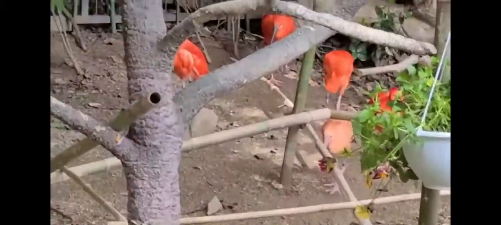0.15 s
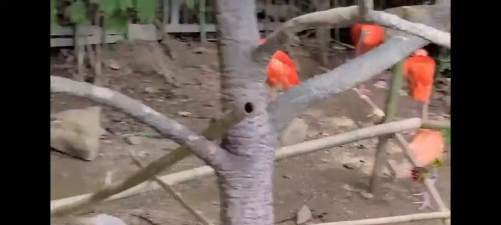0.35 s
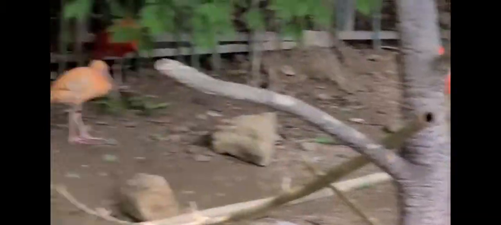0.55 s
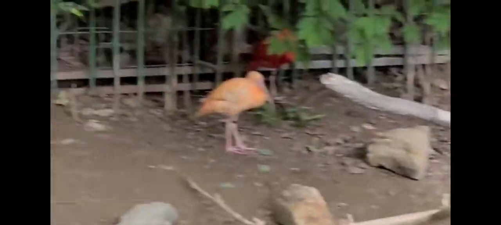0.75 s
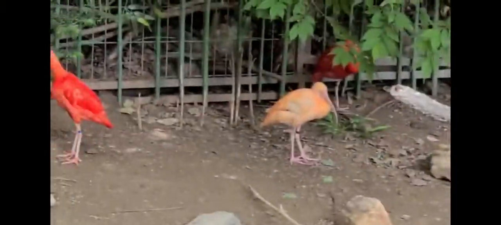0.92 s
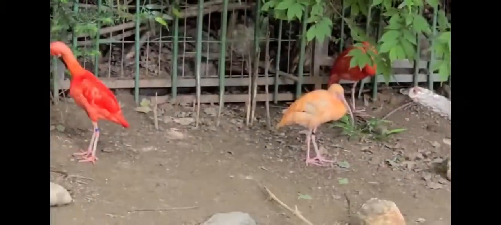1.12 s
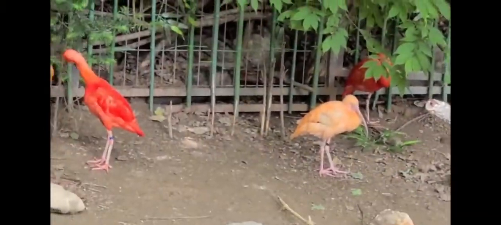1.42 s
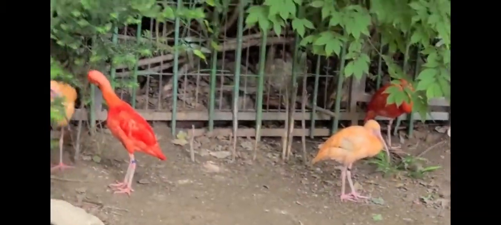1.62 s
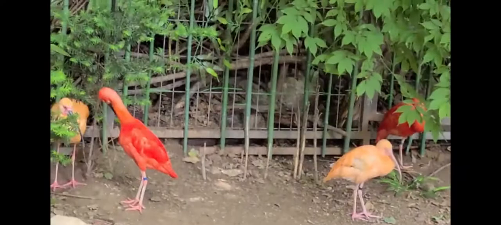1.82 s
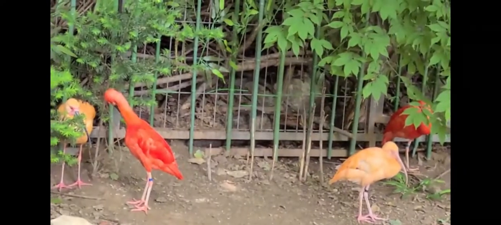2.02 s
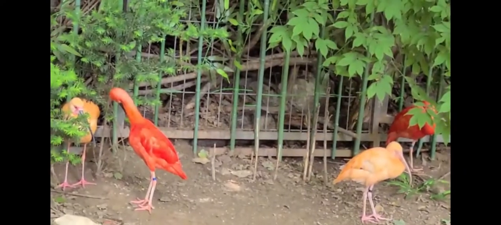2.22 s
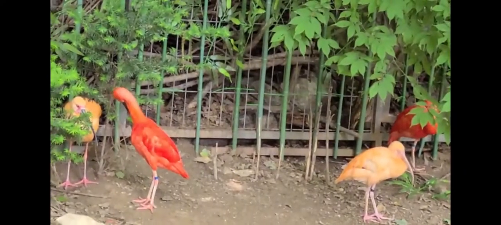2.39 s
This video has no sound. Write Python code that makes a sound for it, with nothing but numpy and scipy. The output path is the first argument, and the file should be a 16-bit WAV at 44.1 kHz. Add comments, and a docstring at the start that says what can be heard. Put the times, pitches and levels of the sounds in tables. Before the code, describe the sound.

Guttural bird grunts sound close and slightly right, then softer grunts, clipped barks and nasal honks answer from farther off, over murmuring flock, faint hiss and low rumble, picked up by a handheld stereo microphone outdoors.

```python
"""Gabbling flock of wading birds

Wading birds, probably flamingos, gabble in an outdoor enclosure. Each call is a train of throat pulses,
110 to 144 a second, that rings the bird's resonances and chops a rasp of air. Near birds grunt on the right;
others grunt, bark and honk further off. Shaped noise makes the flock's murmur, an air hiss and a low rumble."""
import sys
import numpy as np
from scipy import signal
from scipy.fft import rfft, irfft, next_fast_len
from scipy.io import wavfile
from scipy.ndimage import map_coordinates

SR = 44100
rng = np.random.default_rng(int(sys.argv[2]) if len(sys.argv) > 2 else 0)


def transcribe(signal):
    """Save signal, clipped to [-1, 1], as a 16-bit WAV file at the path in sys.argv[1]."""
    frames = np.atleast_2d(signal).T
    limited = np.clip(frames, -1, 1)
    pcm = np.round(limited * 32767).astype(np.int16)
    wavfile.write(sys.argv[1], SR, pcm)


N = 112454

# Near grunts: t/s, length/s, level/dB, pulse rate/Hz, throat tuning/ratio,
# second resonance/dB, upper resonances/dB, rasp/dB
NEAR_GRUNT_CALLS = [ (.1695, 0.078, -13.5, 119.3, 1.02, -11.5, -11.5, -18.5),
                    (.2505, .06, -19.5, 113.9, 0.97, -11.5, -10, -18),
                    (.3085, 0.18, -14, 115.8, 1.006, -10, -16.5, -17),
                    (.508, 0.051, -17.5, 119.8, 1, -13, -27, -28),
                    (.55, 0.1195, -13, 116.8, 1.012, -13.5, -21.5, -19),
                    (2.1685, .088, -15.5, 119.7, 0.98, -12.5, -8.5, -16),
                    (2.2905, 0.16, -16, 116.2, 0.974, -8.5, -4.5, -14),
                    (2.4355, 0.054, -19, 113.3, 0.97, -9, -6, -20),
                    (2.505, 0.18, -20, 112, .96, -5.5, -8, -16)]
# Near throats, in low, second and upper groups: f/Hz, width/Hz, level/dB
NEAR_RESONANCES = ([(1031, 134, -1), (847, 100, -10.5), (1350, 320, -22)], [(2263, 270, 3),
                   (3080, 710, -14)], [(3390, 360, -10.5), (4630, 210, -10), (6730, 3600, -17)])
# Rasp spectrum of grunts and honks: f/Hz, relative density/dB per Hz
GRUNT_RASP_SPECTRUM = [(600, -7), (1500, 13), (3200, 4), (6000, 0), (9000, -5.5), (12000, -3.5),
                       (15500, -5.5)]


def near_grunts():
    """Sharp-onset, lightly scattered pulse trains; earlier and louder on the right."""
    return birds(NEAR_GRUNT_CALLS, NEAR_RESONANCES, GRUNT_RASP_SPECTRUM,
                 attack_s=0.007, release_s=0.0079, jitter_s=0.00008, phase_spread_rad=0.51,
                 scatter_db=-12, left_lag_ms=0.125, left_minus_right_db=-1.1, echo_db=-9)


# Far grunts: t/s, length/s, level/dB, pulse rate/Hz, throat tuning/ratio,
# second resonance/dB, upper resonances/dB, rasp/dB
FAR_GRUNT_CALLS = [ (.95, 0.069, -27.5, 116.8, 0.99, -9, -10, -14),
                   (1.001, 0.078, -25, 113.2, .99, -6, -12, -13),
                   (1.222, 0.12, -23, 114.8, 0.97, -9.5, -12, -19.5),
                   (1.33, 0.089, -28.5, 114.5, 1.0, -5, -16, -10),
                   (1.527, 0.15, -25, 113.1, 0.98, -8, -9, -17)]
# Far throats, in low, second and upper groups: f/Hz, width/Hz, level/dB
FAR_RESONANCES = ([(976, 158, 3.5), (829, 60, -8.5), (1250, 390, -4.5)], [(2310, 300, 4),
                  (2015, 180, -2.5)], [(3460, 700, -10.5), (4760, 250, -12)])


def far_grunts():
    """Softer grunts, heavily scattered on their way."""
    return birds(FAR_GRUNT_CALLS, FAR_RESONANCES, GRUNT_RASP_SPECTRUM,
                 attack_s=0.018, release_s=0.012, jitter_s=0.00014, phase_spread_rad=0.34,
                 scatter_db=2.5, left_lag_ms=0.02, left_minus_right_db=1.2, echo_db=-8)


# Barks: t/s, length/s, level/dB, pulse rate/Hz, throat tuning/ratio,
# second resonance/dB, upper resonances/dB, rasp/dB
BARK_CALLS = [ (.028, 0.047, -20, 125.9, 1.0, -11, -19, -12),
              (.172, 0.048, -23.5, 119.5, 1.04, -17, -5, -9),
              (.399, 0.061, -19.5, 120.4, 0.97, -10, -13, -12),
              (.467, 0.033, -22.5, 118.7, 1.05, -11, -11, -1.5),
              (.691, 0.046, -25.5, 115.9, 0.83, -13, -9, -1.5),
              (.877, 0.046, -21.5, 110.1, 1.03, -15, -13, -8),
              (1.112, 0.057, -19.5, 125.5, 0.977, -1.5, -7.5, -11),
              (1.359, 0.057, -21.5, 117.1, 0.986, 0.5, -8.5, -13.5),
              (1.418, 0.0509, -21.5, 117.3, 0.986, -0.5, -7.5, -14.5),
              (1.652, 0.039, -16.5, 121.8, 1.03, -1.5, -8.5, -17.5),
              (1.969, 0.047, -19.5, 116.9, 1.01, -15, -11, -15),
              (2.203, 0.053, -24, 119.5, 1.04, -6, -7.5, -11.5)]
# Barking throats, in low, second and upper groups: f/Hz, width/Hz, level/dB
BARK_RESONANCES = ([(1149, 246, 2.5), (1343, 215, -9.5)], [(2456, 275, -3), (2890, 330, -11.5)],
                   [(3860, 570, -2), (5067, 260, -6), (6190, 400, -12)])
# Bark rasp spectrum: f/Hz, relative density/dB per Hz
BARK_RASP_SPECTRUM = [(600, -50), (1500, 9), (3200, -1), (6000, 5.5), (8200, -6), (12000, 4.5), (15500, -3)]


def barks():
    """Short pulse trains with a rasp of their own colour."""
    return birds(BARK_CALLS, BARK_RESONANCES, BARK_RASP_SPECTRUM,
                 attack_s=0.026, release_s=0.016, jitter_s=0.00022, phase_spread_rad=0.58,
                 scatter_db=-4, left_lag_ms=-0.008, left_minus_right_db=0.9, echo_db=-7)


# Honks: t/s, length/s, level/dB, pulse rate/Hz, throat tuning/ratio,
# second resonance/dB, upper resonances/dB, rasp/dB
HONK_CALLS = [ (0, 0.088, -21, 130.6, 0.96, -9.5, -13.5, -12.5),
              (.25, 0.084, -22, 140.4, 0.97, -13, -21, -17),
              (.675, 0.091, -23.5, 134.2, 1.035, -18, -31, -12),
              (.9, 0.1, -26.5, 132.9, 0.94, -15, -29, -18), (1.33, 0.08, -25, 140.8, 0.95, -1.5, -6, -26),
              (1.67, 0.085, -24.5, 130.6, 1, -9, -20, -12.5),
              (1.872, .105, -25, 135.7, 1.072, -14, -28, -14.5),
              (2.034, 0.061, -23.5, 127.9, 0.98, -14, -23, -20.5),
              (2.062, .06, -26, 143.5, 1.15, -12, -25, -17),
              (2.265, 0.096, -23, 141.5, 0.96, -13, -26, -34)]
# Honking throats, in low, second and upper groups: f/Hz, width/Hz, level/dB
HONK_RESONANCES = ([(1000, 154, -2.5), (1326, 234, 0.5), (870, 32, 0.5)], [(2640, 1600, 0)],
                   [(4140, 380, 0)])


def honks():
    """Faster, more jittered pulse trains, the most scattered and echoing group."""
    return birds(HONK_CALLS, HONK_RESONANCES, GRUNT_RASP_SPECTRUM,
                 attack_s=0.013, release_s=0.025, jitter_s=0.00037, phase_spread_rad=0.63,
                 scatter_db=3.5, left_lag_ms=0.025, left_minus_right_db=-0.3, echo_db=-6)


def birds(calls, throat, rasp_spectrum, attack_s, release_s, jitter_s, phase_spread_rad,
          scatter_db, left_lag_ms, left_minus_right_db, echo_db):
    """One group: scattered voices placed by lag and level, plus their rasp and echoes."""
    rasp_echo_db = 2
    # the throats radiate little below 659 Hz
    radiation = signal.butter(4, 659, 'high', fs=SR, output='sos')
    direct, puffs, echoes = np.zeros(N), np.zeros(N), np.zeros((2, N))
    for row in calls:
        start_s = row[0]
        voice, air = call(row, throat, attack_s, release_s, jitter_s, phase_spread_rad)
        voice = scattered(signal.sosfilt(radiation, voice), scatter_db)
        add(direct, voice, start_s)
        add(puffs, air, start_s)
        add(echoes, echo(voice), start_s)

    sides = np.array([[1], [-1]])  # left, right

    def placement(hz):
        """Half the lag and half the level difference on each side."""
        lag = np.exp(-1j * np.pi * hz * sides * left_lag_ms / 1000)
        return amp(sides * left_minus_right_db / 2) * lag

    placed = filtered(direct, placement)
    rasp = puffs * noise(rasp_spectrum, alike=0.05)
    rasp_echo = echo(rasp[0])[:, :N]
    return placed + amp(echo_db) * echoes + rasp + amp(rasp_echo_db) * rasp_echo


def call(row, throat, attack_s, release_s, jitter_s, phase_spread_rad):
    """One call: each throat pulse rings the resonances, then lets out a puff of air."""
    _, length_s, level_db, rate_hz, tuning, second_db, upper_db, rasp_db = row
    rate_sag, throat_arch, effort_db = 0.04, 0.02, 4
    rough_hz, puff_rise_s, puff_decay_s = 5400, 0.0024, 0.0015
    count = 32  # pulses past the call's length get zero size
    pulse_s = np.arange(count) / rate_hz
    progress = np.clip((pulse_s + 0.5 / rate_hz) / length_s, 0, 1)

    attack = np.clip((pulse_s + 0.5 / rate_hz) / attack_s, 0, 1)
    release = np.clip((length_s - pulse_s) / release_s, 0, 1)
    size = attack * release * amp(level_db + 0.44 * rng.standard_normal(count))

    # pulses slow down over the call; resonances and brightness rise and fall
    sag_s = rate_sag * length_s * progress * (1 - progress) / 2
    pulse_s = np.abs(pulse_s - sag_s + jitter_s * rng.standard_normal(count))
    arch = np.sin(np.pi * progress)[:, None] - 2 / np.pi
    tune = tuning * (1 + throat_arch * arch)
    bright_db = effort_db * arch

    t = np.arange(SR // 30) / SR
    index = (np.round(pulse_s * SR).astype(int)[:, None] + np.arange(len(t))).ravel()
    rings = 0
    for group, group_db in zip(throat, (0, second_db + bright_db / 2, upper_db + bright_db)):
        for hz, width_hz, resonance_db in group:
            life = t ** 2 * np.exp(-np.pi * width_hz * t * np.pi / 2)
            life *= np.sqrt(2 * SR / rate_hz / np.sum(life ** 2))
            # phases scatter more from pulse to pulse the higher the resonance
            spread = phase_spread_rad + np.pi * (hz / rough_hz) ** 2
            phase = spread * rng.standard_normal((count, 1))
            pitch_hz = hz * tune + 0.25 * width_hz * rng.standard_normal((count, 1))
            ring = life * np.sin(2 * np.pi * pitch_hz * t + phase)
            rings = rings + amp(group_db + resonance_db) * ring

    puff = (1 - np.exp(-t / puff_rise_s)) * np.exp(-t / puff_decay_s)
    puff = puff * amp(rasp_db + bright_db) * np.sqrt(SR / rate_hz / np.sum(puff ** 2))
    voice = np.bincount(index, (size[:, None] * rings).ravel())
    air = np.bincount(index, (size[:, None] * puff).ravel())
    return voice, air


def scattered(x, scatter_db):
    """Fence, ground and branches blur the pulses on their way, at the same energy."""
    scatter_s, fence_s, fence_db = 0.0071, 0.0087, -13
    t = np.arange(SR // 20) / SR
    path = rng.standard_normal(len(t)) * np.exp(-t / scatter_s)
    path *= amp(scatter_db) / np.linalg.norm(path)
    path[0] += 1  # direct sound
    path[round(fence_s * SR)] += amp(fence_db)
    y = signal.fftconvolve(x, path)
    return y * np.linalg.norm(x) / np.linalg.norm(y)


# Enclosure decay: f/Hz, t60/s
ENCLOSURE_DECAY = [(200, 0.43), (1000, 0.3), (3000, 0.32), (12000, 0.067)]


def echo(x):
    """The enclosure rings as decaying noise, differently on each side."""
    hz, t, z = signal.stft(rng.standard_normal((2, SR // 3)), SR, nperseg=256)
    decay = amp(-60 * t / along(ENCLOSURE_DECAY, hz)[:, None])
    tail = signal.istft(z * decay, SR, nperseg=256)[1]
    return signal.fftconvolve(x[None], tail / np.linalg.norm(tail[0]), axes=1)


# Murmur spectrum: f/Hz, relative density/dB per Hz
MURMUR_SPECTRUM = [(200, -18.5), (500, -4.5), (680, -12.5), (850, -5), (1400, 3.5), (1800, -2),
                   (2500, -13.5), (4500, -19.5), (9000, -22)]


def flock_murmur():
    """The far flock blurs into noise of wandering level."""
    level_db = -34.5 + 4.5 * wobble(8.9)
    return amp(level_db) * noise(MURMUR_SPECTRUM, alike=0.088)


# Open air spectrum: f/Hz, relative density/dB per Hz
AIR_SPECTRUM = [(150, -16), (250, -3), (385, -7.5), (658, 2), (852, -3), (1560, -4), (1760, -5.5),
                (2900, -0.5), (4550, -9.5), (5040, -11), (15500, -21.5)]


def air_hiss():
    """Open air as steady shaped noise."""
    return amp(-29.5) * noise(AIR_SPECTRUM, alike=0.3)


# Rumble spectrum: f/Hz, relative density/dB per Hz
RUMBLE_SPECTRUM = [(13, -43), (22, -20), (76, 1.5), (113, -3.5), (146, -9.5), (193, -6), (232, -18),
                   (400, -9.5), (520, -19), (880, -120)]


def low_rumble():
    """Low noise, nearly the same on both sides, its level barely wandering."""
    level_db = -34 + 0.17 * wobble(7.9)
    return amp(level_db) * noise(RUMBLE_SPECTRUM, alike=0.99)


def amp(db):
    """Decibels to gain."""
    return 10 ** (np.asarray(db) / 20)


def unit(x):
    """Scaled to rms 1."""
    return x / np.sqrt(np.mean(x ** 2) + 1e-20)


def along(points, hz):
    """(f/Hz, value) points interpolated on a log frequency axis."""
    f, v = np.transpose(points)
    return np.interp(np.log(hz + 1), np.log(f + 1), v)


def filtered(x, response):
    """x through a complex response of frequency."""
    m = next_fast_len(N + SR // 2)
    spectrum = rfft(x, m) * response(np.fft.rfftfreq(m, 1 / SR))
    return irfft(spectrum, m)[..., :N]


def noise(spectrum, alike):
    """Stereo noise of rms 1; alike is the power share common to both sides."""
    white = rng.standard_normal((3, N))
    common, *own = filtered(white, lambda hz: amp(along(spectrum, hz)))
    alike = np.clip(alike, 0, 1)
    return unit(np.sqrt(alike) * common + np.sqrt(1 - alike) * np.array(own))


def wobble(rate_hz):
    """A smooth random curve, rate_hz knots a second."""
    knots = rng.standard_normal(int(N * rate_hz / SR) + 4)
    return map_coordinates(knots, [np.arange(N) * rate_hz / SR])


def add(track, x, start_s):
    """Mixes x into the track from start_s on."""
    i = max(round(start_s * SR), 0)
    part = track[..., i:i + x.shape[-1]]
    part += x[..., :part.shape[-1]]


def scene():
    """Four groups of callers over murmur, hiss and rumble."""
    callers = near_grunts() + far_grunts() + barks() + honks()
    return callers + flock_murmur() + air_hiss() + low_rumble()


def record(dry):
    """Clips at full scale, then removes everything from the band limit up."""
    top_hz = 15450
    return filtered(np.clip(dry, -1, 1), lambda hz: hz < top_hz)


dry = scene()
out = record(dry)
transcribe(out)
```